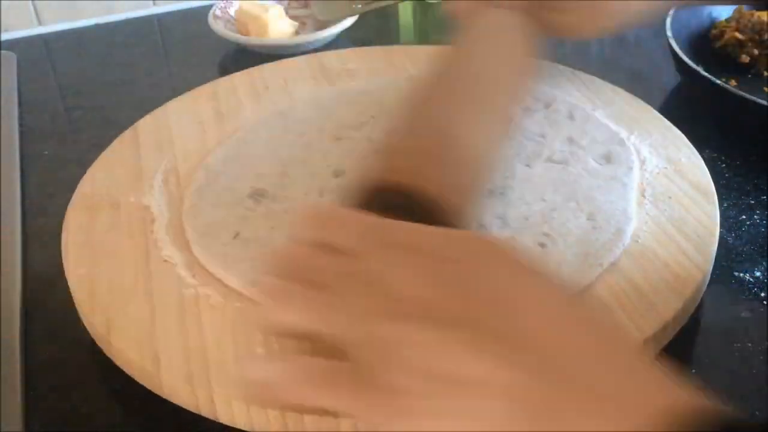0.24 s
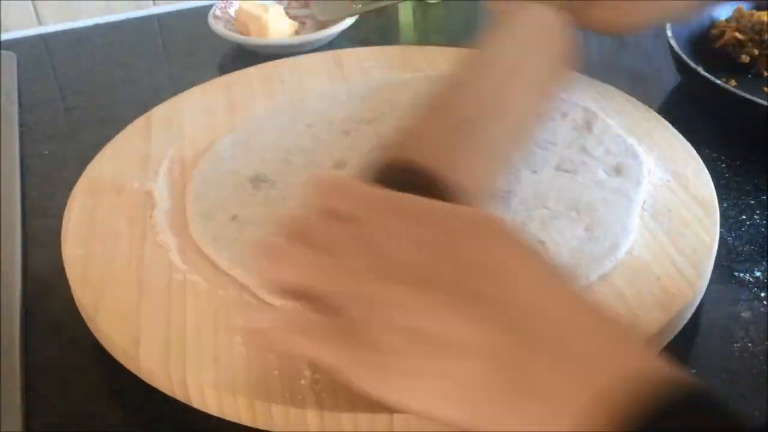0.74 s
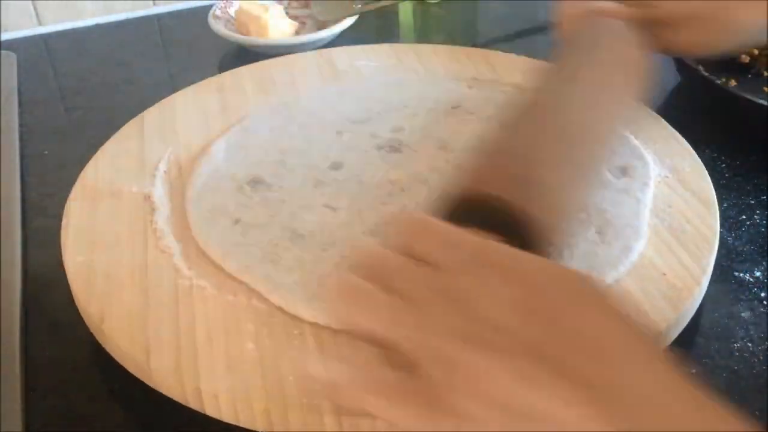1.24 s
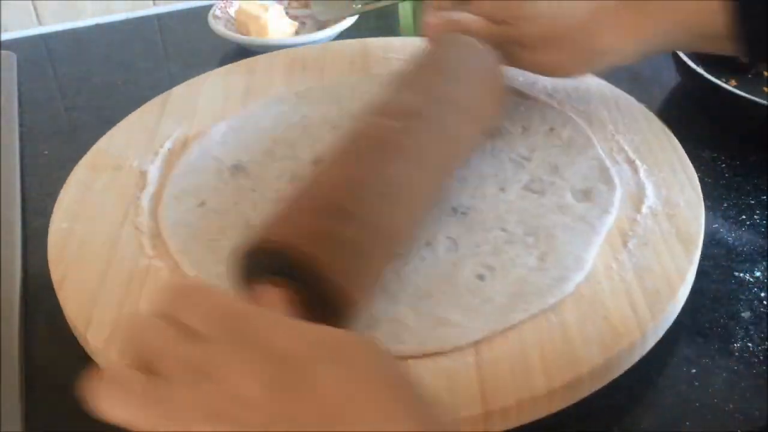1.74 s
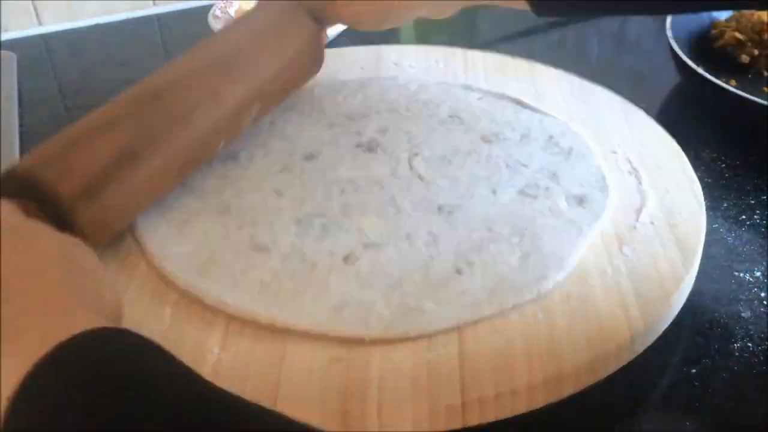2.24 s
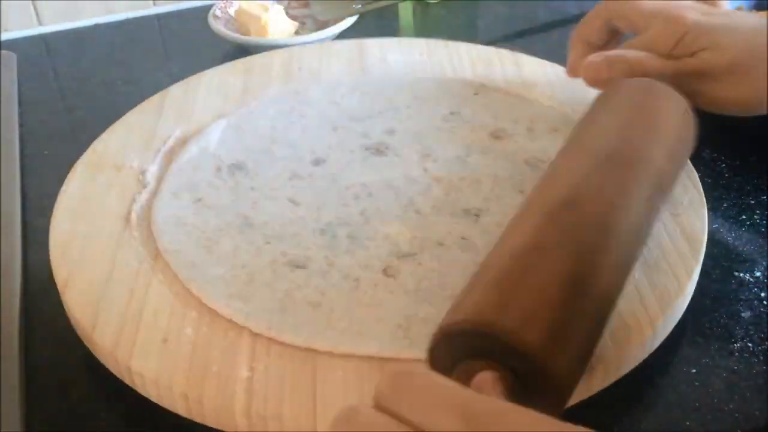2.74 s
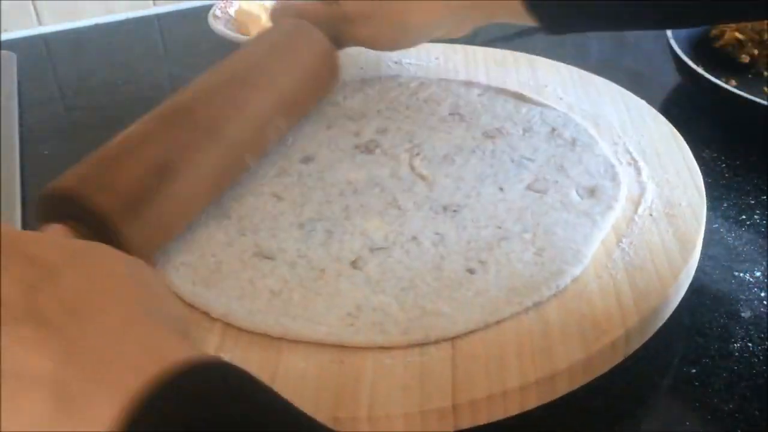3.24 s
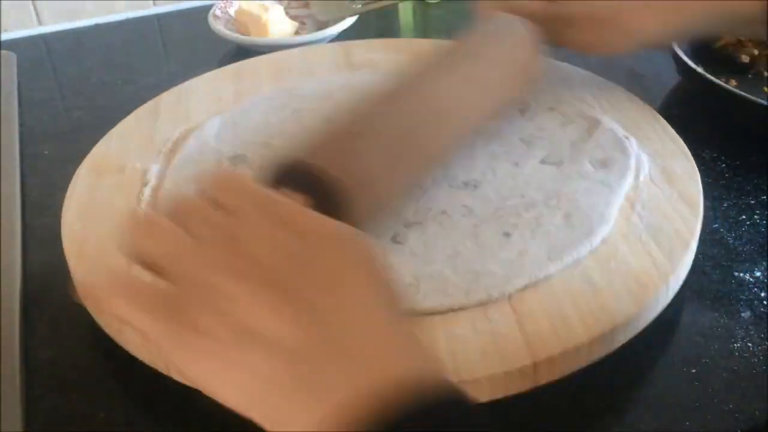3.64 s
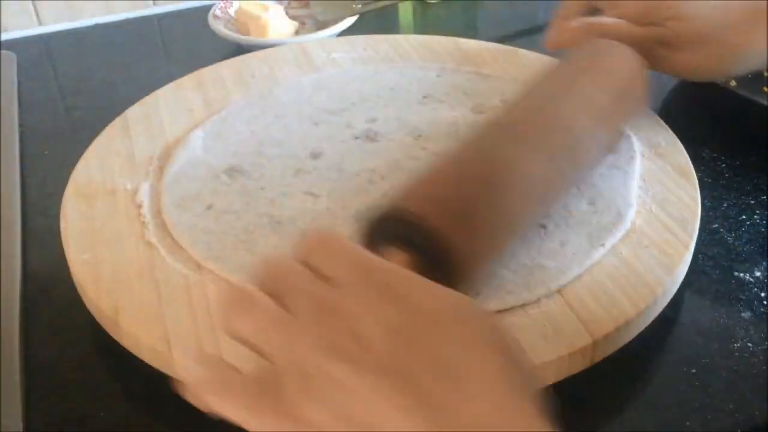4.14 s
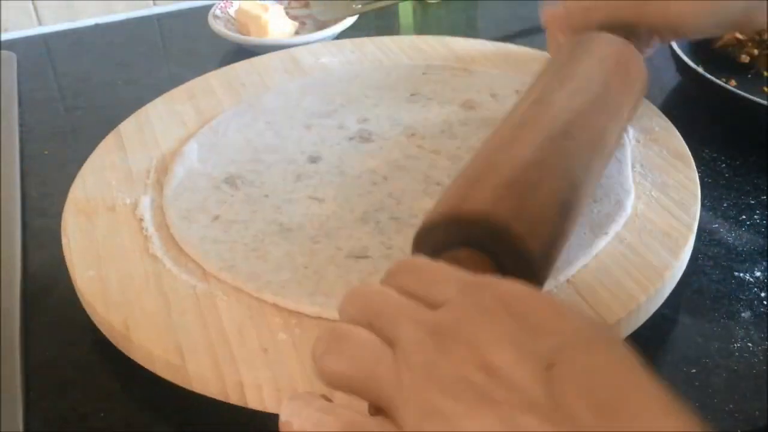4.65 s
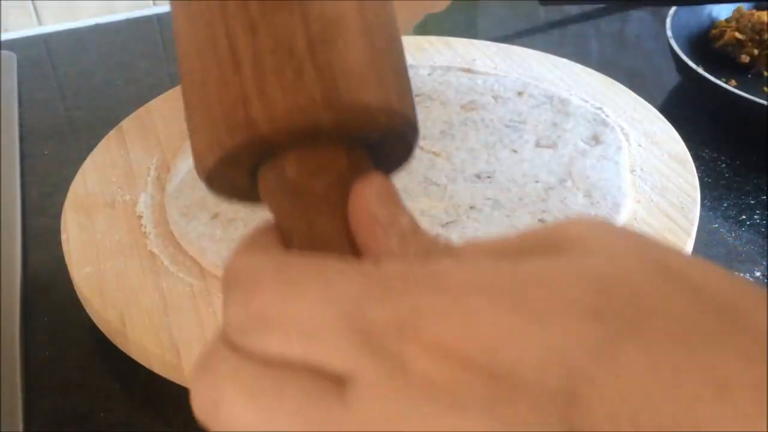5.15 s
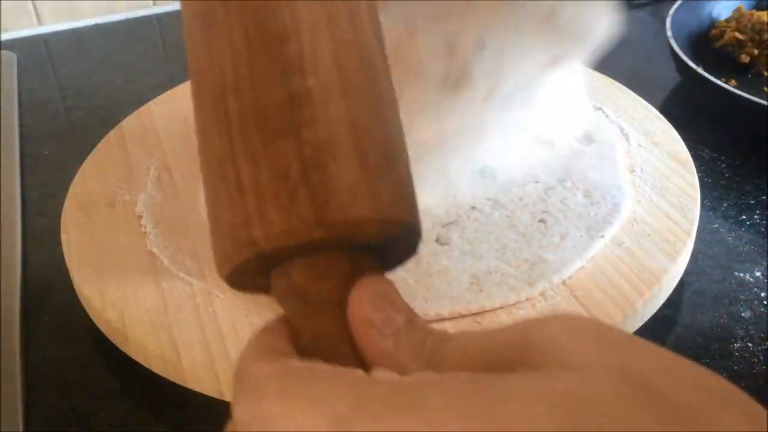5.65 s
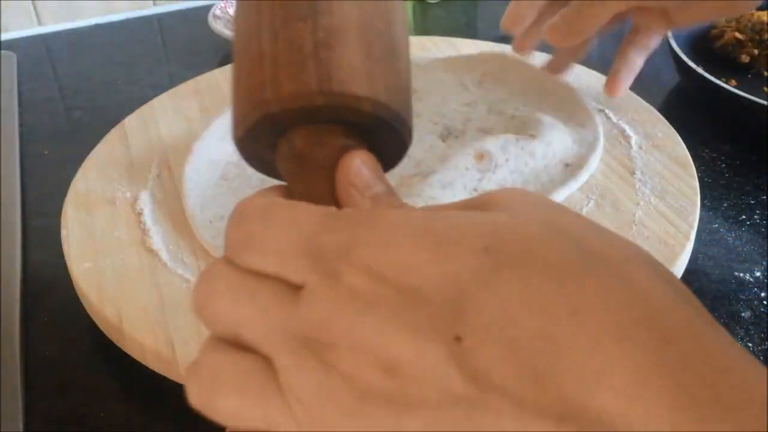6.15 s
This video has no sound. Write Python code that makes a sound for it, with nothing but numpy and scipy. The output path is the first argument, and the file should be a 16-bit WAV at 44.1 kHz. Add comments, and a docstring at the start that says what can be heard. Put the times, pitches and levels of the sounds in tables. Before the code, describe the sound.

Close up in a tiled kitchen, a wooden pin is already moving over dough, with a hollow thud at 0.1 seconds. Strokes run to and fro roughly every quarter second, low uneven rumbles with faint flour hiss, dry wooden rub and soft knocks, one clearer at 0.6. At 1.46 a small hard thing rattles briefly; at 1.65 a sharp, bright clack rings and echoes shortly. Softer thuds follow around 2.1 to 2.2, then a deep heavy boom at 2.4 and the loudest double clack at 2.53. A weaker clack comes at 3.07. Rolling continues low and gentle, with tiny ticks, rumbling slightly more from 4.0 to 4.8, and fades by 5.0. Then near quiet: faint finger brushes and peeling from 5.2 to 6.0, and at 6.2 the dough flops down with a soft slap and brief rustle. A very quiet room hush lies beneath.

```python
"""A wooden pin, already in mid stroke, thuds and rolls dough on a round board in a tiled kitchen.
The board stands hollow on a stone counter: lumps shake its modes into a rumble, landings ring them.
Flour hiss and wood rub are coloured noise that swells with each stroke; something hard clacks nearby
as a crack and decaying sines, a small thing rattles. Fingers peel the dough up and it flops back.
The microphone is near; the room answers the hits only, and a quiet bed of air lies behind."""
import sys
import numpy as np
from scipy import signal
from scipy.fft import rfft, irfft
from scipy.io import wavfile
from scipy.ndimage import uniform_filter1d, map_coordinates

SR = 44100
rng = np.random.default_rng(int(sys.argv[2]) if len(sys.argv) > 2 else 0)


def generate_wav(signal):
    """Clip the signal to [-1, 1] and save it as 16-bit WAV at the path in sys.argv[1]."""
    frames = np.transpose(np.atleast_2d(signal))
    scaled = np.clip(frames, -1, 1) * 32767
    pcm = np.round(scaled).astype(np.int16)
    wavfile.write(sys.argv[1], SR, pcm)


N = 281358

# the board and the air under it, two close modes that beat: pitch_hz, level_db, t60_s
BOARD_AND_AIR_MODES = [(80, 0, .23), (97, 0, .23)]
# other modes of the wooden board: pitch_hz, level_db, t60_s
WOOD_MODES = [(54.5, -19, 0.33), (121, -17, 0.29), (190.6, -8.5, .13), (372, -13.5, 0.054),
              (433.2, -24.5, 0.028), (600, -31.5, .05), (744.3, -16.5, 0.12), (856, -26.5, 0.021),
              (974, -21, 0.18), (1146, -21.5, 0.07)]


def undb(db):
    """Gain of a level in dB."""
    return 10 ** (np.asarray(db) / 20)


def level(x, db):
    """Scale to an rms level in dB."""
    return x * undb(db) / np.sqrt(np.mean(x ** 2))


def colour(x, points):
    """Shape the spectrum by (Hz, dB) points joined on a log-frequency axis."""
    hz, db = np.transpose(points)
    f = np.maximum(np.arange(len(x) // 2 + 1) * SR / len(x), 1)
    gain_db = np.interp(np.log(f), np.log(hz), db)
    return irfft(rfft(x) * undb(gain_db), len(x))


def walk(rate):
    """Random levels, rate new ones per second, joined by straight slopes; spread just under 1."""
    hold = int(SR / rate)
    steps = np.repeat(rng.standard_normal(N // hold + 1), hold)
    return uniform_filter1d(steps, hold)[:N]


def ring(modes, extra_db, seconds):
    """Decaying sines, peak 1; neighbouring rows start opposed, so a close pair swells and then cancels."""
    hz, db, t60 = np.transpose(modes)[:, :, None]
    t = np.arange(int(seconds * SR)) / SR
    sign = (-1.) ** np.arange(len(hz))[:, None]
    decay = undb(db + extra_db - 60 * t / t60)
    y = np.sum(sign * decay * np.sin(2 * np.pi * hz * t), axis=0)
    return y / np.abs(y).max()


def add(out, s, x):
    """Mix x into out from time s."""
    i = int(s * SR)
    out[i:i + len(x)] += x[:len(out) - i]


def burst(hz, octaves, seconds, rise, grain_db):
    """A puff of grainy band noise around hz, with time constants (s) for decay and rise."""
    t = np.arange(int(8 * seconds * SR) + 64) / SR
    edges_hz = [hz / 2 ** octaves, min(hz * 2 ** octaves, .45 * SR)]
    band = signal.butter(2, edges_hz, "band", fs=SR, output="sos")
    # each grain keeps its level for 64 samples
    grain_levels = np.repeat(rng.standard_normal(len(t) // 32 + 2), 64)[:2 * len(t)]
    grains = undb(grain_db * grain_levels) * rng.standard_normal(2 * len(t))
    # the first half only lets the filter settle
    noise = signal.sosfilt(band, grains)[len(t):]
    return level(noise, -5.0) * np.exp(-t / seconds) * (1 - np.exp(-t / rise))


def swells(starts, lengths, db, peak, arc):
    """Summed power of moves that speed up for the share peak and slow down again; arc shapes the swell."""
    part = (np.arange(N) / SR - starts[:, None]) / lengths[:, None]
    speed = np.clip(np.minimum(part / peak, (1 - part) / (1 - peak)), 0, 1)
    return undb(db) ** 2 @ np.sin(np.pi / 2 * speed) ** (2 * arc)


def motion():
    """Levels (dB) of rumble, hiss and rub: powers of strokes, brushing fingers and leaning hands add up."""
    # strokes of the pin, to and fro: start_s, length_s, flour_hiss_db, board_rumble_db
    strokes = [(-.08, 0.31, -59, -38.5), (0.303, 0.25, -63.5, -44), (0.561, 0.22, -63, -43.5),
               (0.755, 0.26, -58.5, -48.5), (1.043, 0.21, -64.5, -48.5), (1.24, 0.52, -63, -46),
               (1.668, 0.24, -53, -74), (1.878, 0.18, -62, -55), (2.064, 0.29, -57.5, -55),
               (2.392, 0.27, -69, -26.5), (2.703, 0.35, -68, -51), (2.937, 0.26, -86, -39.5),
               (3.105, 0.28, -63.5, -50), (3.457, 0.32, -62.5, -52), (3.603, 0.43, -58, -52),
               (4.033, 0.29, -61, -47.5), (4.32, 0.28, -63, -41), (4.568, 0.31, -61, -43.5),
               (4.748, 0.2, -67, -43.5), (4.848, 0.19, -85, -47.5)]
    # fingers brush and peel the dough, last it flops back: start_s, length_s, hiss_db, rub_db
    brushes = [(5.182, 0.099, -57.5, -59.5), (5.241, 0.08, -71, -68), (5.416, 0.16, -66, -61.5),
               (5.588, 0.074, -64, -63.5), (5.721, 0.15, -70, -70), (5.885, 0.15, -64.5, -69),
               (6.156, 0.25, -54.5, -47)]
    s, length, hiss_db, rumble_db = np.transpose(strokes)
    brush_s, brush_length, brush_hiss_db, brush_rub_db = np.transpose(brushes)
    # the rub of a stroke lies between its hiss and its rumble
    hiss_share, rub_offset_db = .7, -2
    rub_db = rub_offset_db + hiss_share * hiss_db + (1 - hiss_share) * rumble_db

    def pin(db):
        """Power of the pin strokes."""
        return swells(s, length, db, peak=0.38, arc=0.93)

    def fingers(db):
        """Power of the finger moves, quick to start."""
        return swells(brush_s, brush_length, db, peak=0.15, arc=2.9)

    # between strokes the hands still lean on the pin;
    # from 4.43 s this resting rumble, hiss and rub fade under the last strokes
    fade_start_s, rumble_fades_db_per_s, hiss_fades_db_per_s = 4.43, 8.5, 6.5
    lean_rumble_db, lean_hiss_db, lean_rub_db = -54, -71.5, -67.5
    fading_s = np.maximum(np.arange(N) / SR - fade_start_s, 0)
    rumble = pin(rumble_db) + undb(lean_rumble_db - rumble_fades_db_per_s * fading_s) ** 2
    hiss = pin(hiss_db) + fingers(brush_hiss_db)
    hiss = hiss + undb(lean_hiss_db - hiss_fades_db_per_s * fading_s) ** 2
    rub = pin(rub_db) + fingers(brush_rub_db)
    # the rub fades at the pace of the hiss
    rub = rub + undb(lean_rub_db - hiss_fades_db_per_s * fading_s) ** 2
    return [10 * np.log10(power) for power in (rumble, hiss, rub)]


def rolling(rumble_db, flour_db, rub_db):
    """Lumps under the pin shake the board; flour hisses; wood rubs unevenly and crumbs pop under it."""
    # colour of the flour hiss: frequency_hz, gain_db
    flour_colour = [(500, -7.5), (1500, 2.5), (4000, 1.5), (9000, -2), (16000, -5)]
    # colour of the rubbing wood: frequency_hz, gain_db
    rub_colour = [(250, -13.5), (500, -2.5), (1000, -2), (2000, -4), (3500, -10.5), (6000, -29.5)]

    lumps = rng.standard_normal(N) * undb(5.6 * walk(26))
    # the dough under the pin damps the upper modes
    modes = BOARD_AND_AIR_MODES + WOOD_MODES
    pressed_t60_s = 0.027
    pressed = [(hz, db, t60 if hz < 250 else pressed_t60_s) for hz, db, t60 in modes]
    # pressed down by the pin, the hollow booms less
    pressed_db = np.array([-6.] * len(BOARD_AND_AIR_MODES) + [0.] * len(WOOD_MODES))[:, None]
    rumble = signal.fftconvolve(lumps, ring(pressed, pressed_db, .4))[:N]
    # the pitch of the rumble wanders slowly at random
    drift = .06 * walk(9)
    read_at = np.arange(N) + np.cumsum(drift - drift.mean())
    rumble = map_coordinates(rumble, [read_at], order=1, mode="mirror")

    grains = rng.standard_normal(N) * undb(2.2 * walk(24))
    # about 70 pops a second, each dying away over 1.3 ms
    pops = (rng.random(N) < 70 / SR) * undb(2.2 * rng.standard_normal(N))
    popping = signal.lfilter([1], [1, -np.exp(-1 / (0.0013 * SR))], pops)
    grains = grains * (1 + .8 * popping)

    rub = rng.standard_normal(N) * (undb(2.4 * walk(56)) + 1.6 * popping)
    # hard crumbs crack one by one, about 90 a second
    rub = rub + (rng.random(N) < 90 / SR) * 20 * rng.standard_normal(N)

    rumble = undb(rumble_db) * level(rumble, 0.71)
    hiss = undb(flour_db) * level(colour(grains, flour_colour), 2.5)
    rub = undb(rub_db) * level(colour(rub, rub_colour), -0.84)
    return rumble + hiss + rub


def thuds():
    """Each landing rings the board, its modes detuned a little at random; a harder one wakes the upper modes."""
    # the pin or dough lands on the board: start_s, level_db, hardness_db, slap_db
    landings = [(0.073, -14.5, -11.5, -6), (0.347, -29, -10.5, -11), (0.473, -32.5, -16, -24),
                (0.631, -19.5, -8, -19.5), (0.883, -35.5, -13.5, -13), (0.934, -30.5, -21.5, -19),
                (1.41, -34, -50, -38), (1.527, -33, -26, -14.5), (1.648, -26, -11.5, -3.5),
                (1.862, -29, -23, -30), (1.952, -31, -17.5, -34), (2.103, -22.5, -21, -35.5),
                (2.209, -21.5, -4, -15), (2.406, -9, -6.5, -15), (2.415, -3, -6, -16.5),
                (2.486, -30.5, 11.5, 7), (2.977, -24.5, -21, -36), (3.062, -28, -16, -23),
                (3.534, -37.5, -30, -25), (3.595, -34.5, -39, -16.5), (3.845, -32, -18, -28),
                (4.163, -32, -29, -18), (4.422, -34.5, -6, -17), (4.443, -28.5, -15, -23),
                (4.926, -37, -27, -27), (5.428, -48.5, -28.5, -20.5), (6.212, -31, -14.5, -5),
                (6.289, -36.5, -23, -29)]
    out, rest = np.zeros(N), np.array(BOARD_AND_AIR_MODES + WOOD_MODES)
    # 0 up to 130 Hz, 1 from an octave above it
    upper = np.clip(np.log2(rest[:, 0] / 130.0), 0, 1)
    # the soft contact spreads the blow over about 1.5 ms
    push = np.hanning(int(0.0015 * SR) + 3)
    draws = rng.standard_normal((len(landings), 2, len(rest)))
    for (s, db, hard_db, slap_db), (scatter, detune) in zip(landings, draws):
        modes = rest.copy()
        modes[:, 0] *= 1 + (.018 + .006 * upper) * detune
        scatter_db = 2.5 * scatter
        # the mode levels are those of an ordinary landing, of hardness near -17 dB
        y = ring(modes, (upper * (hard_db + 17.0 + scatter_db))[:, None], .4)
        add(out, s, undb(db) * np.convolve(y, push / push.sum()))
        # rough wooden body of a hard landing, then the slap on top
        add(out, s, undb(db + hard_db - 4.5) * burst(333, 0.82, 0.018, 0.0019, 1.6))
        add(out, s, undb(db + slap_db) * burst(787, 0.58, 0.02, 0.0043, 3.5))
    return out


def clacks():
    """A hard blow: a crack, then the modes, those near the struck spot's pitch strongest."""
    # hard clacks: start_s, level_db, strongest_ring_hz, tilt_db_per_octave, crack_db, width_octaves
    blows = [(1.644, -0.5, 3686, -2, -5, .05), (1.648, -4.5, 3743, 4, -11, .06),
             (2.532, 2, 3400, -2.5, -10.5, .15), (2.543, 0.5, 3960, -0.5, -5, .25),
             (3.066, -11.5, 3374, -3, -2.5, .08)]
    # modes of the hard thing: pitch_hz, level_db, t60_s
    clack_modes = np.array([(1594, -13.5, 0.016), (1834, -9.5, 0.015), (1986, -7.5, 0.01),
                            (2360, -12, 0.035), (2537, -18.5, 0.029), (2680, -14, 0.012), (3177, -8, 0.015),
                            (3320, -6, 0.034), (3660, -8.5, 0.05), (3728, -7, .035), (3717, -10.5, 0.028),
                            (3884, -10.5, 0.025), (4298, -10.5, 0.032), (4550, -17.5, 0.015),
                            (5722, -13, .012), (6220, -14, 0.026), (7370, -11, 0.016), (8340, -17.5, .012),
                            (9600, -23, 0.0027), (12000, -23, .008)])
    out, hz = np.zeros(N), clack_modes[:, :1]
    for s, db, spot_hz, tilt_db, crack_db, octaves in blows:
        spot_db = 8.6 * np.exp(-(np.log2(hz / spot_hz) / octaves) ** 2)
        lift_db = spot_db + tilt_db * np.log2(hz / 3500)
        # each blow also detunes the modes slightly at random
        detuned = clack_modes * (1 + [[.005, 0, 0]] * rng.standard_normal(hz.shape))
        y = ring(detuned, lift_db, 0.26)
        # the contact takes a moment to build
        build = 1 - np.exp(-np.arange(len(y)) / (0.00019 * SR))
        add(out, s, undb(db) * y * build)
        crack_hz = 2900 * 2 ** (tilt_db / 5)
        add(out, s, undb(db + crack_db) * burst(crack_hz, 0.68, 0.0062, 0.0022, 0.64))
        # crisp edge
        edge_db = db + crack_db + 2 * tilt_db - 25.5
        add(out, s, undb(edge_db) * burst(11000, .55, .008, .0005, 2.5))
    return out


def rattle():
    """Each bounce rings the same modes in another mix, a little detuned, with a dry click on top."""
    # a small hard thing taps and rattles on: start_s, level_db
    bounces = [(1.46, -22.5), (1.4649, -21.5), (1.470, -21), (1.476, -25), (1.488, -31.5), (1.513, -36)]
    # its modes: pitch_hz, level_db, t60_s
    rattle_modes = np.array([(1110, -8.5, 0.027), (1940, -4.5, .012), (2550, -1.5, 0.02), (4300, -11, .008),
                             (6090, -4.5, 0.018), (7750, -4.5, .008)])
    out = np.zeros(N)
    draws = rng.standard_normal((len(bounces), 2, len(rattle_modes), 1))
    for (s, db), (mix, detune) in zip(bounces, draws):
        modes = rattle_modes * (1 + [[.025, 0, 0]] * detune)
        add(out, s, undb(db) * ring(modes, 3 * mix, .1))
        add(out, s, undb(db - 7.5) * burst(5000, 3.5, .005, .0004, 3.0))
    return out


def ticks():
    """Short puffs of noise, each with its own colour, and a thin fading ring of very narrow noise."""
    # small ticks of wood and crumbs: start_s, level_db, centre_hz, spread_octaves
    puffs = [(0.073, -35, 2170, 0.56), (.344, -40.5, 1140, 0.62), (.631, -36, 2530, 0.58),
             (1.235, -40, 850, 0.29), (1.27, -41.5, 1000, 0.65), (1.459, -20, 7000, 1.14),
             (2.409, -30, 2860, 0.65), (2.4163, -15, 2700, 0.69), (2.484, -24, 3600, 0.42),
             (3.063, -30.5, 1775, 1.15), (4.046, -34.5, 1375, 0.38), (4.422, -38.5, 890, 0.76),
             (4.638, -39, 1100, 0.44), (4.696, -37.5, 1100, 0.48), (5.203, -47, 2515, 0.1),
             (5.626, -44.5, 1300, 0.43), (6.172, -50, 1798, 0.87), (6.193, -32, 1606, 0.37),
             (6.202, -34.5, 2570, 0.23), (6.213, -23.5, 1210, 0.55), (6.234, -31.5, 1680, .5),
             (6.264, -35, 1120, 0.11), (6.222, -33, 690, 0.11)]
    # a faint thin ring dying away: start_s, level_db, pitch_hz, decay_s
    thin_rings = [(0, -46, 3420, 0.028)]
    out = np.zeros(N)
    for s, db, hz, octaves in puffs:
        add(out, s, undb(db) * burst(hz, max(octaves, .03), .006, .0004, 1.4))
    for s, db, hz, seconds in thin_rings:
        add(out, s, undb(db) * burst(hz, 0.024, seconds, .002, 1.5))
    return out


def kitchen(x):
    """Diffuse tail of the tiled room: noise whose fading time depends on frequency, shortest at the top."""
    # reverberation of the kitchen: frequency_hz, t60_s
    reverberation = [(100, 0.39), (400, 0.46), (1000, 0.63), (2500, 0.45), (3700, 0.47), (5500, 0.38),
                     (9000, 0.44), (14000, 0.25)]
    f, frames, z = signal.stft(rng.standard_normal(int(.8 * SR)), SR, nperseg=256)
    hz, t60 = np.transpose(reverberation)
    fade = undb(-60 * frames / np.interp(f, hz, t60)[:, None])
    tail = signal.istft(z * fade, SR, nperseg=256)[1]
    # the echoes build up over a few ms
    tail = tail * (1 - np.exp(-np.arange(len(tail)) / (0.0022 * SR)))
    tail = tail / np.sqrt(np.sum(tail ** 2))
    room_db = -9.5
    return signal.fftconvolve(x, undb(room_db) * tail)[:N]


def quiet_air():
    """Steady background: white noise coloured to the hush of the place."""
    # colour of the background: frequency_hz, gain_db
    air_colour = [(15, -34), (25, -13), (102, 0), (463, -10), (714, -14), (1400, -14.5), (1740, -19),
                  (2350, -24.5), (13200, -21.5), (16000, -30)]
    return level(colour(rng.standard_normal(N), air_colour), -68.5)


def scene():
    """Near sounds, the echo of the hits in the kitchen and the quiet air."""
    hits = clacks() + rattle() + ticks() + thuds()
    roll = rolling(*motion())
    return (hits + kitchen(hits) + roll + quiet_air())[None]


def record(dry):
    """The microphone drops the deep bass, rounds the loudest peaks and cuts the top."""
    low_hz, top_hz, ceiling = 34.2, 15800, .92
    thin = signal.sosfilt(signal.butter(2, low_hz, "high", fs=SR, output="sos"), dry)
    rounded = thin / (1 + (thin / ceiling) ** 6) ** (1 / 6)
    return signal.sosfilt(signal.ellip(8, .2, 70, top_hz, fs=SR, output="sos"), rounded)


dry = scene()
out = record(dry)
generate_wav(out)
```